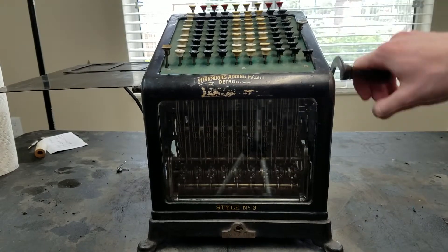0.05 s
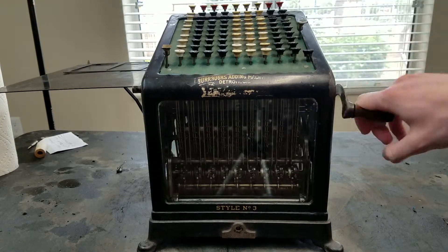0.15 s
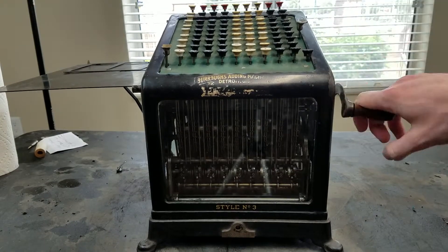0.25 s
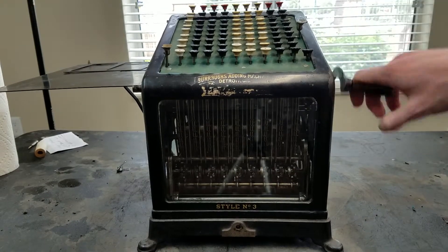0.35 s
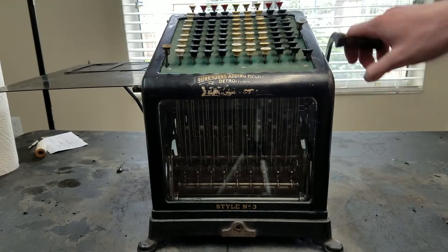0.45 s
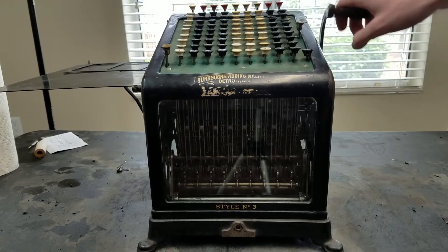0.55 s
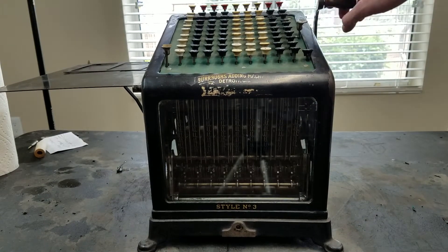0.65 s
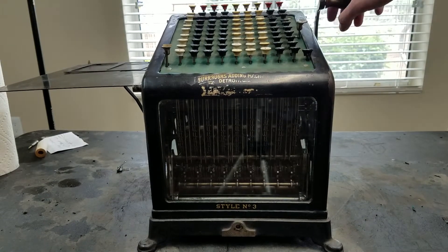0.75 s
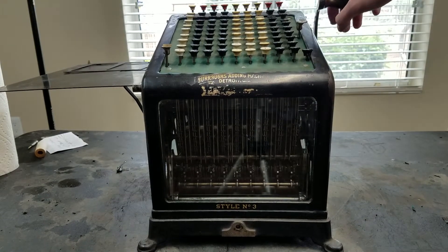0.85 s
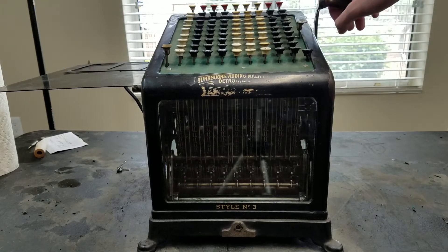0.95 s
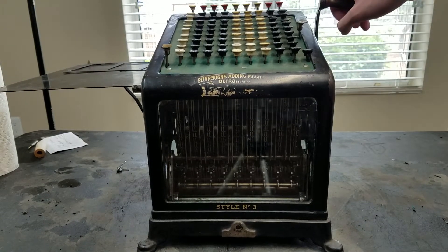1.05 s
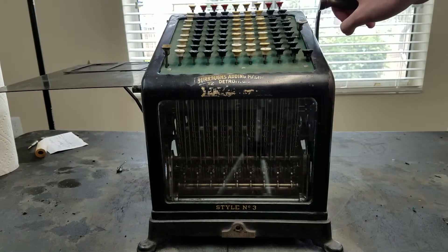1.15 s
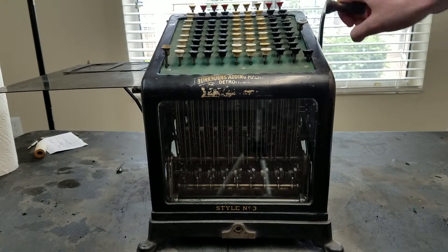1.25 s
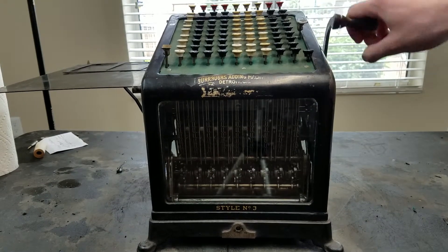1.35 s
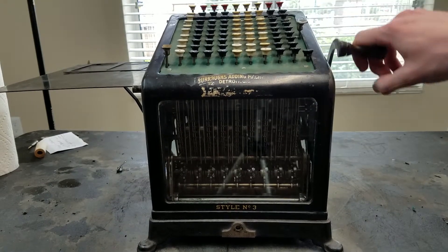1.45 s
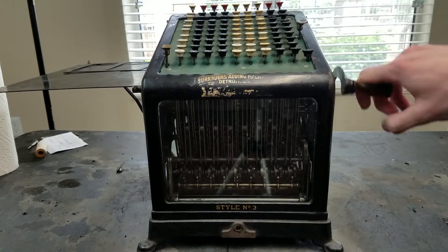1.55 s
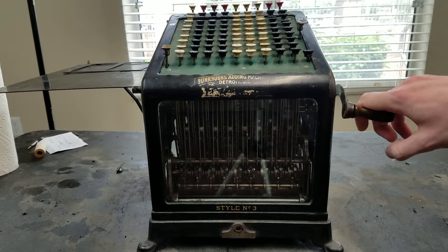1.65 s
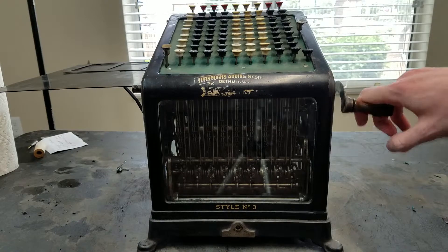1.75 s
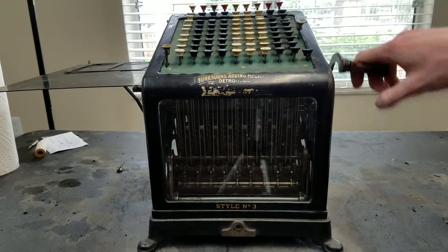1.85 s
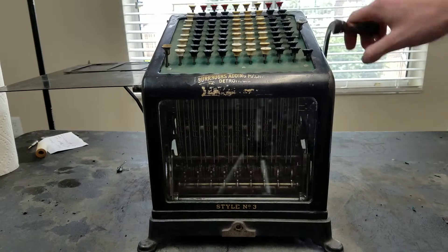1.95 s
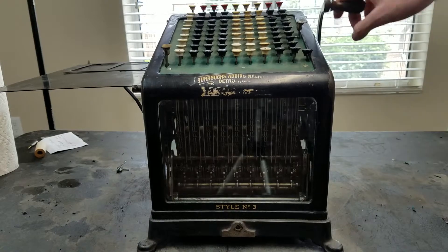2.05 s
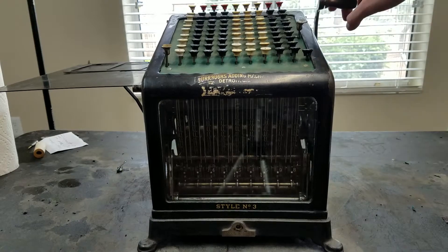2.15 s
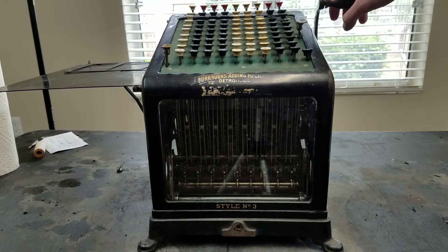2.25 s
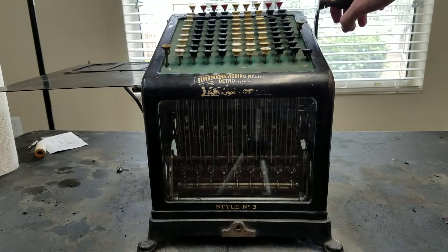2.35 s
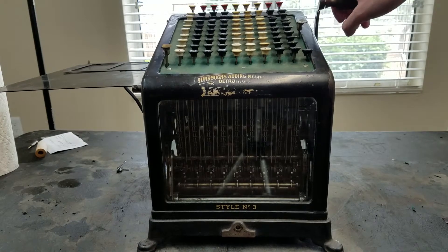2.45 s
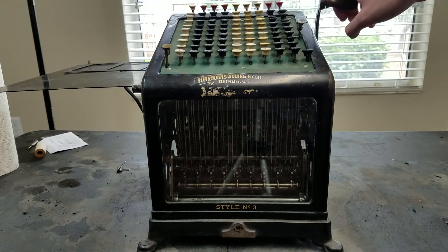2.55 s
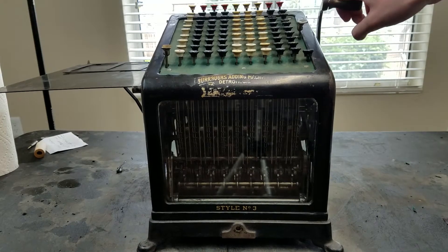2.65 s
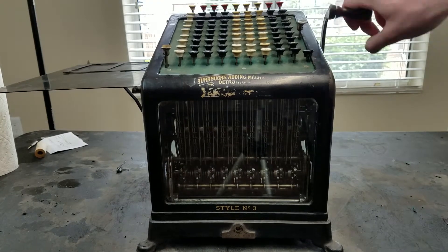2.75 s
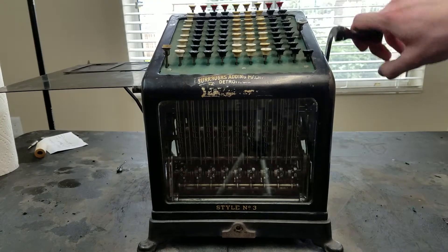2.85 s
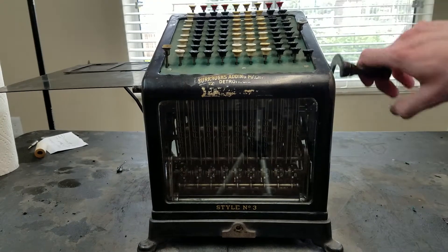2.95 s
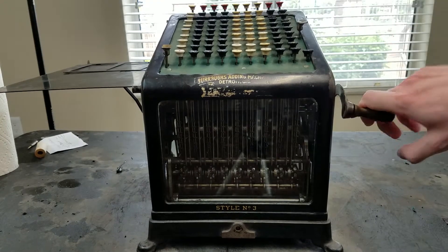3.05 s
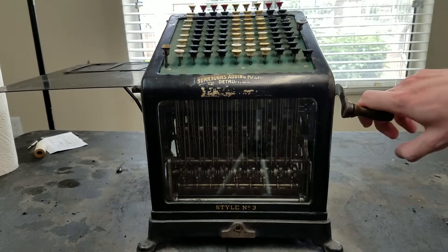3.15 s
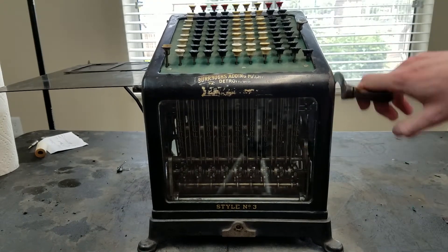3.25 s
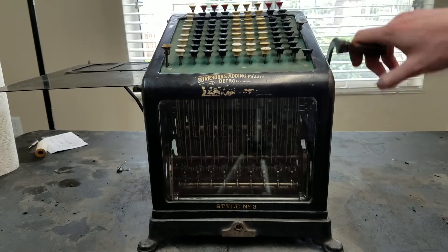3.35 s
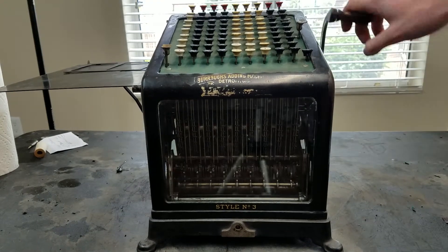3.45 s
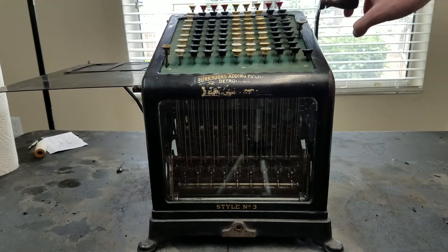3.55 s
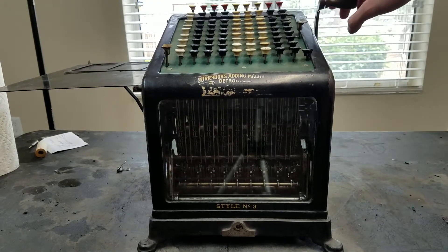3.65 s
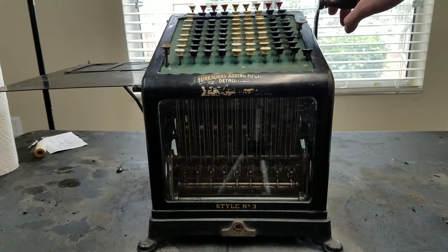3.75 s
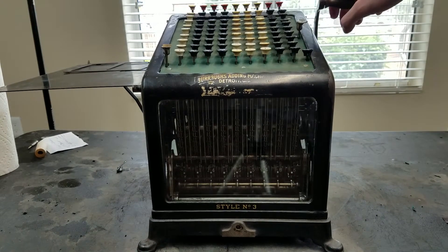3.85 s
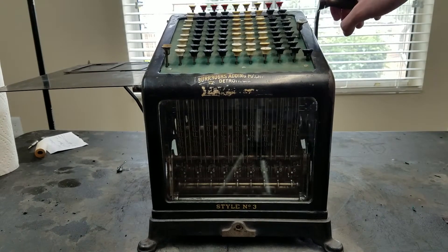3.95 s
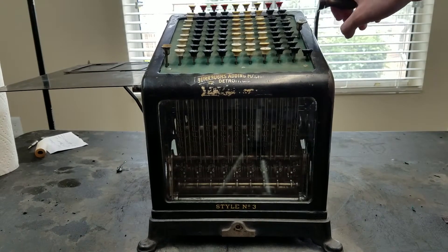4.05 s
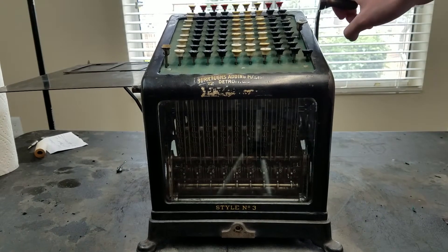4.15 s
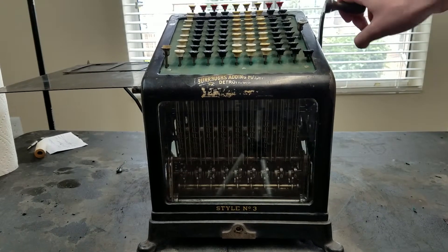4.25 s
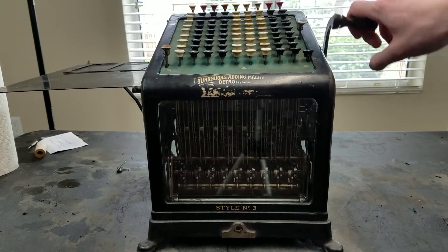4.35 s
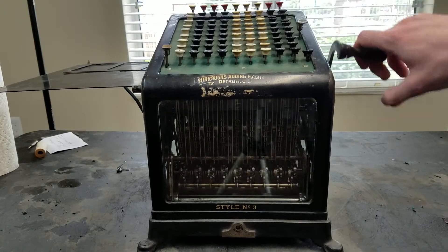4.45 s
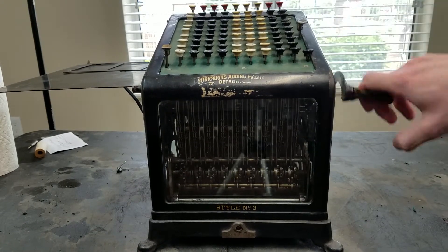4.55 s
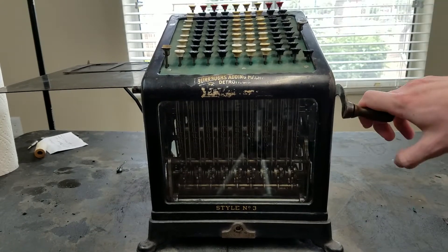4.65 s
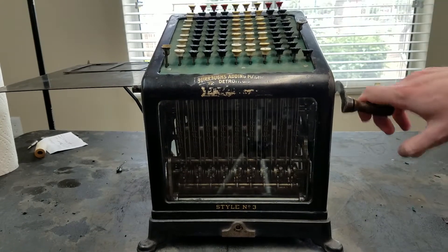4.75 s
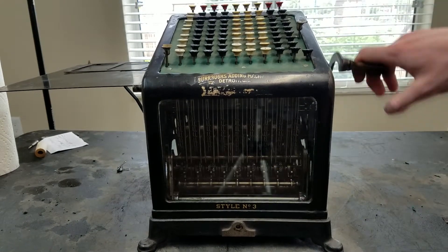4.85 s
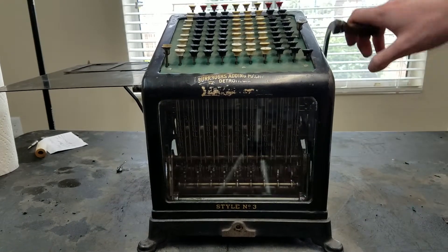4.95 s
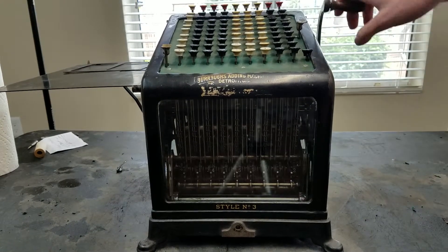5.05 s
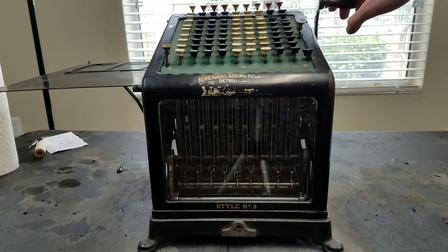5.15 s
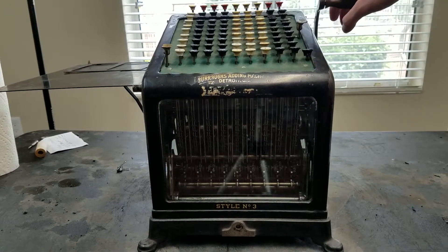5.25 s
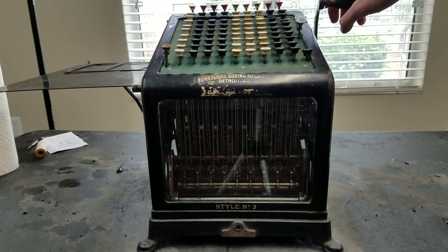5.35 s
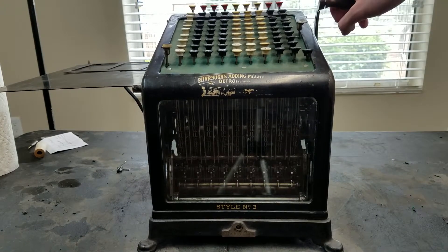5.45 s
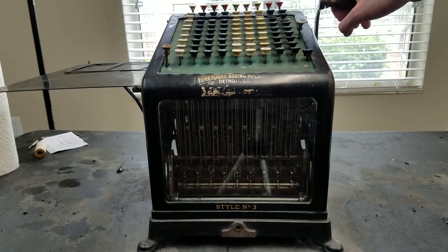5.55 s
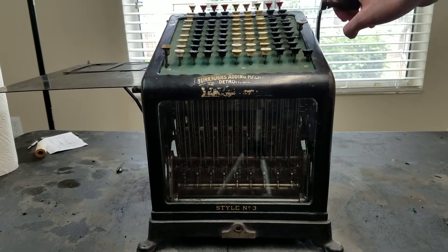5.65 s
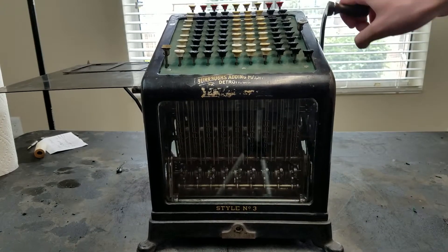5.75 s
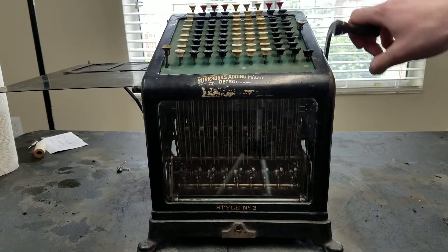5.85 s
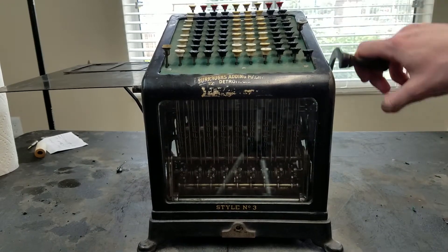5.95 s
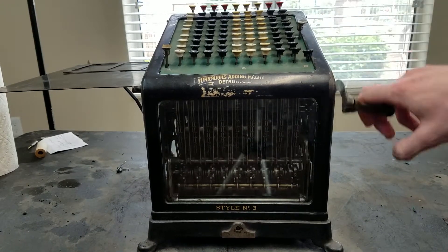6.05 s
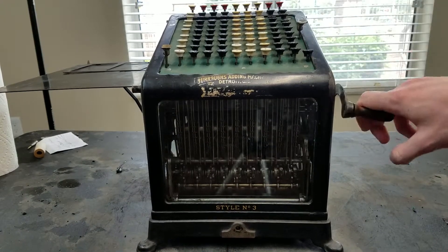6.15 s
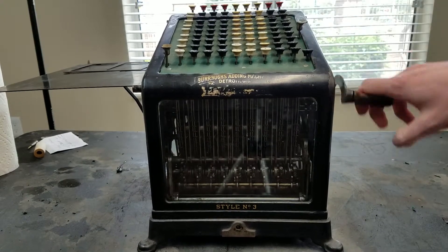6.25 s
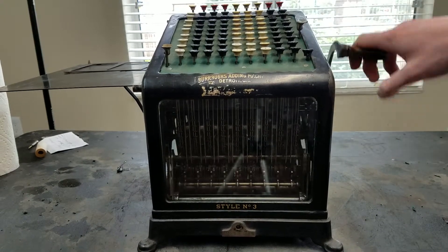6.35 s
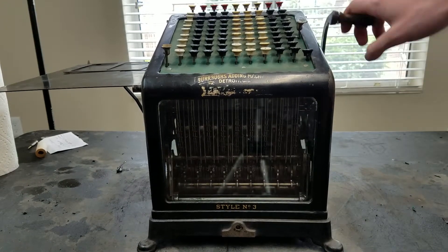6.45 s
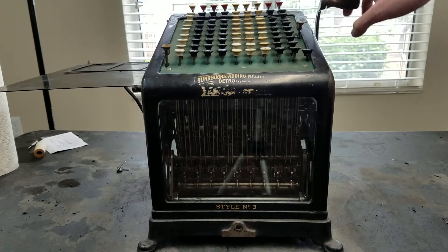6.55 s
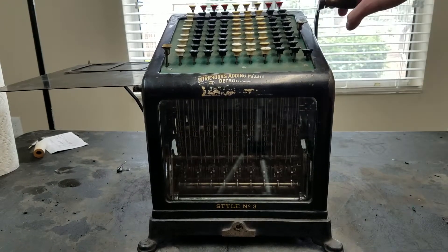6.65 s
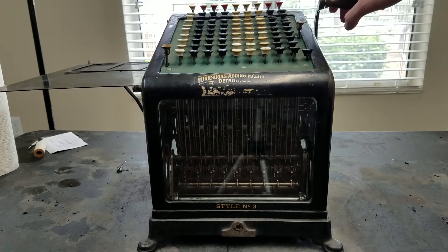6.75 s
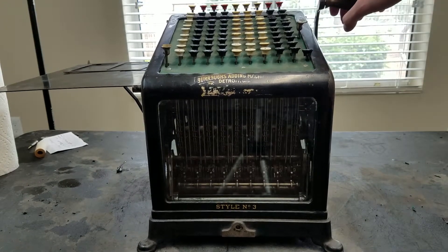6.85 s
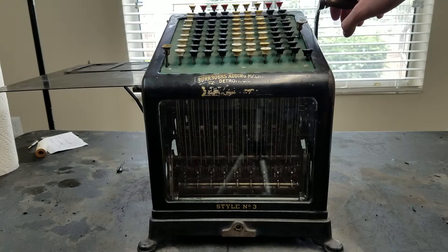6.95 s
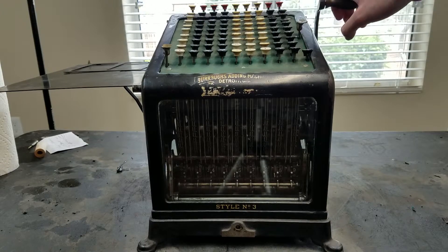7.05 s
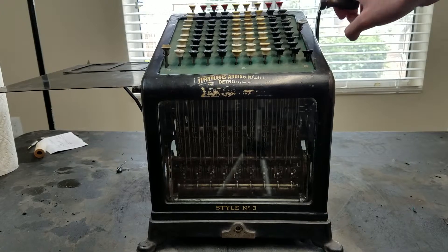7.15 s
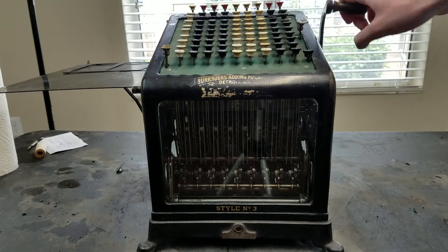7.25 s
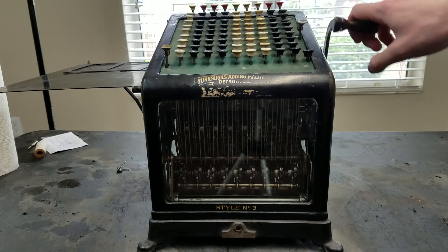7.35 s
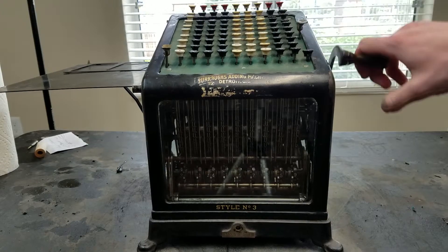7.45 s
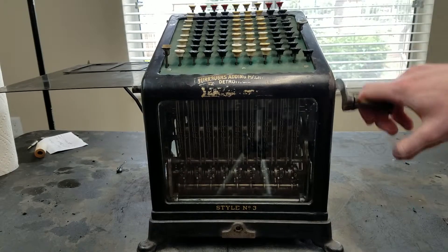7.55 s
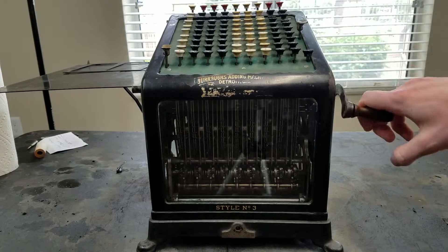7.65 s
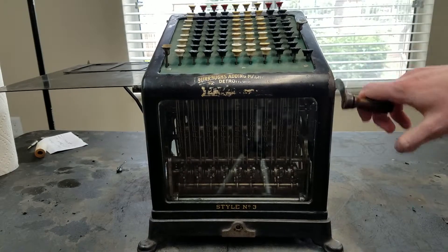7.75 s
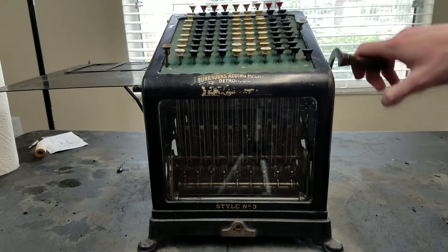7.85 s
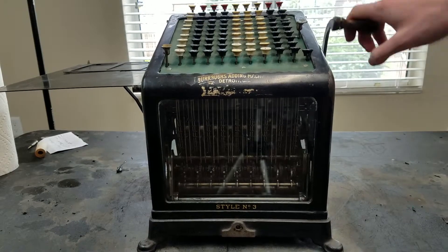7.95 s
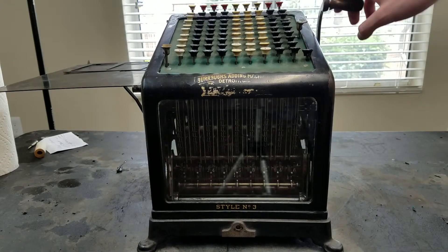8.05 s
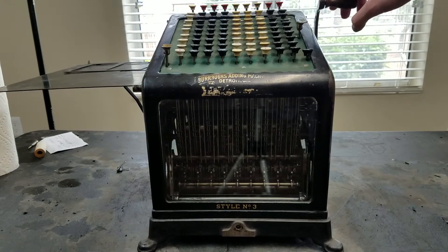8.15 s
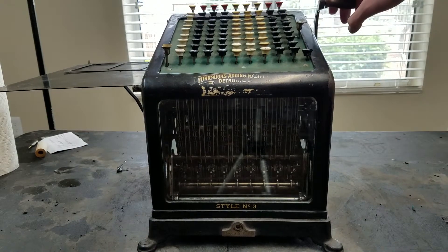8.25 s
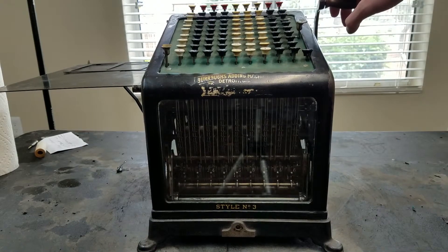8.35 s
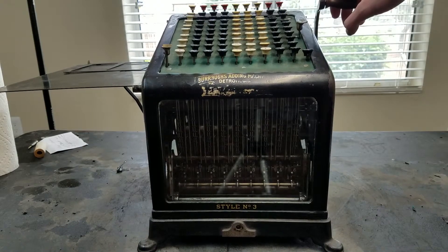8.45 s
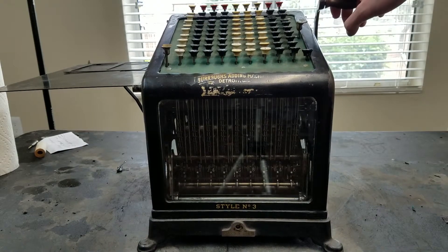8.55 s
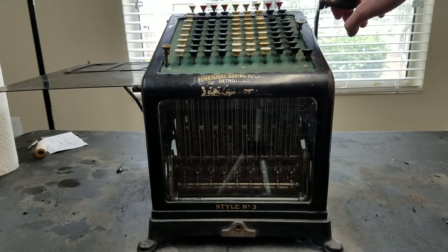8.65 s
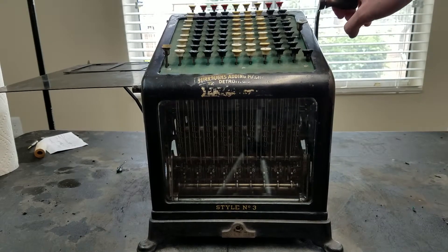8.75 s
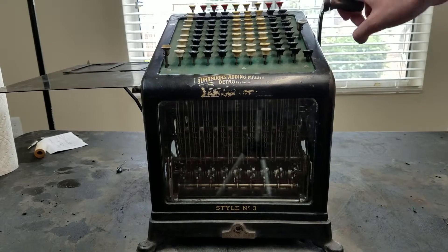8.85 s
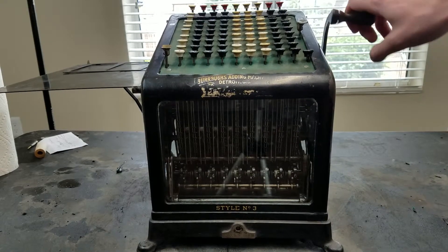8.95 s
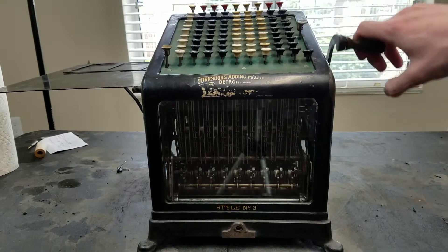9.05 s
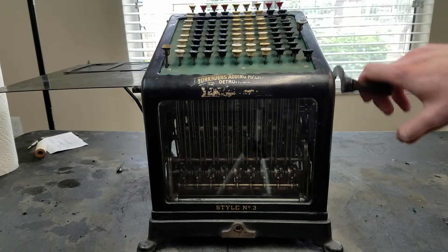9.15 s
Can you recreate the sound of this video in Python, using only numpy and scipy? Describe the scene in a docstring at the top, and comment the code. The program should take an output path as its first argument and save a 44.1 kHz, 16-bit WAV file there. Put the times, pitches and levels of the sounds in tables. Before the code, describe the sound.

A hand-cranked adding machine is pulled repeatedly, each stroke clicking, crashing with a steel ring, then rattling back to a thud in a bare room.

```python
"""A hand-cranked adding machine, pulled and let back again and again on a table in a bare room.
Every stroke runs the same chain of parts: levers click and pawls snap on the pull, the steel racks
let go with a ringing crash, gears rattle and loose levers clink on the return, and the handle lands
on its stop with a thud that the iron case, the table and the room carry on.
Soft room noise and a faint hum sit underneath."""
import sys
import numpy as np
from scipy import signal
from scipy.fft import rfft, irfft, next_fast_len
from scipy.io import wavfile
from scipy.ndimage import uniform_filter1d

SR = 44100
rng = np.random.default_rng(int(sys.argv[2]) if len(sys.argv) > 2 else 0)


def transcribe(u):
    """Save the signal u as a 16-bit wav file named by the first command-line argument.

    u: samples, shape (n,) or (channels, n), limited to [-1, 1]; the rate is SR.
    q: integer samples, one column per channel.
    """
    v = np.clip(np.atleast_2d(u).T, -1, 1)
    q = np.round(v * 32767).astype(np.int16)
    wavfile.write(sys.argv[1], SR, q)


N = 405279

# Cues of a stroke, one row each time they come round: (time [s], strength [dB])
GRIPS = [(1.1837, -1), (2.6174, -4), (4.2145, 5.5), (5.676, 4.5), (7.1427, 0.5), (8.7853, 0)]  # hand tightens on the handle
TOUCHES = [(1.2082, 0), (2.6548, -1.5), (4.2145, -0.42), (5.677, -1.5), (7.2022, -1), (8.8353, -0.72)]  # handle first stirs
TAKE_UPS = [(1.2298, 1), (2.6819, -1), (4.2376, 0), (5.7009, -1), (7.221, 1), (8.8586, -0.5)]  # slack is taken up
LATCHES = [(1.2781, 0), (2.7387, 0.00058), (4.2857, 0), (5.7548, 0), (7.275, 0), (8.9059, 0)]  # key lock drops
PAWLS = [(-0.008, 0.0059), (1.4532, 0), (2.9055, 0), (4.4492, 0.015), (5.9248, 0.0037), (7.4354, 0.0073),
         (9.0727, 0)]  # first pawl catches
CAMS = [(0.0433, 0.005), (1.5047, 0.0096), (2.9507, 0), (4.4998, 0), (5.9726, 0.0051), (7.4816, 0),
        (9.1216, 0)]  # cam passes
LANDINGS = [(0.194, 0), (1.659, 0), (3.0935, 0), (4.6413, 0), (6.117, 0.003), (7.6204, 0)]  # first rack lands
RETURNS = [(0.445, 0.0017), (1.9037, 0.0022), (3.362, 0), (4.8992, 0), (6.3627, 0), (7.881, 0.012)]  # handle starts back
MESHES = [(0.499, 0), (1.9585, 0), (3.4145, 0.0032), (4.9551, 0.0064), (6.4225, 0), (7.9449, 0.0029)]  # wheels mesh
RESETS = [(0.5875, 0), (2.0474, 0), (3.5024, 0), (5.0449, 0), (6.513, 0), (8.033, 0.012)]  # keys spring up
STOPS = [(0.691, 0), (2.154, 0.0058), (3.611, 0.0047), (5.151, 0.011), (6.618, 0), (8.141, 0)]  # handle lands on its stop
# racks let go: (time [s], ring of each of the four rack groups [dB], strength [dB])
RELEASES = [(0.175, -31.5, -25.5, -33, -37.5, 0), (1.6399, -31.5, -28.5, -36.5, -35, 0),
            (3.0781, -31, -25, -35, -35.5, 0.0099), (4.6239, -34, -27.5, -32.5, -36.5, 0),
            (6.099, -29, -27, -34.5, -38, 0.0049), (7.604, -33, -25.5, -32, -39.5, 0),
            (9.26, -30, -27, -31, -34, 0)]
CUES = dict(hand=GRIPS, touch=TOUCHES, take_up=TAKE_UPS, latch=LATCHES, pawl=PAWLS, cam=CAMS,
            release=RELEASES, landing=LANDINGS, back=RETURNS, mesh=MESHES, reset=RESETS, stop=STOPS)

# lever hits: (cue, offset [s], tick [dB], tick pitch [Hz], clack [dB], clank [dB], knock [dB])
LEVER_HITS = [("hand", 0, -68.5, 5000, -54.5, -72, -41.5), ("hand", 0.018, -69.5, 5000, -52.5, -64, -54),
              ("touch", 0, -49, 6800, -48, -56, -49), ("take_up", 0, -37.5, 4000, -41, -39, -35),
              ("take_up", .011, -41.5, 4400, -32.5, -39.5, -33),
              ("latch", -.015, -32, 6000, -28, -30.5, -42), ("latch", 0, -25.5, 6500, -32.5, -33.5, -38),
              ("latch", .003, -22, 4350, -28, -28.5, -33.5), ("latch", .029, -24, 3800, -30.5, -29, -37),
              ("latch", .049, -36, 6000, -25.5, -32.5, -30.5),
              ("pawl", -0.082, -34.5, 6900, -45, -38.5, -46.5),
              ("pawl", -.026, -25.5, 5500, -45, -32.5, -51.5), ("pawl", 0, -34, 11000, -27, -33.5, -28),
              ("pawl", 0.026, -42, 8100, -28.5, -37, -33.5), ("cam", 0, -28, 4700, -28, -32, -35),
              ("cam", .041, -32.5, 8500, -39.5, -38, -41.5),
              ("release", -0.029, -25, 6800, -29, -30, -37.5), ("release", 0, -19.5, 6600, -27.5, -27, -39),
              ("landing", 0, -24.5, 5500, -19.5, -19.5, -29), ("back", -.011, -44, 5700, -27, -32, -34),
              ("back", 0.0028, -21.5, 4400, -29, -32, -33.5), ("back", 0.02, -29, 6400, -25, -28.5, -39),
              ("mesh", 0, -29, 5200, -43, -39, -36), ("mesh", .012, -23.5, 6900, -40.5, -29, -28),
              ("reset", -0.033, -38, 10000, -30, -44, -41.5), ("reset", 0, -22, 7600, -35, -29, -35.5),
              ("reset", 0.03, -26.5, 6500, -28.5, -27.5, -32),
              ("stop", -.052, -33.5, 6000, -33, -37, -38.5),
              ("stop", -0.018, -31.5, 7600, -28.5, -30.5, -33.5), ("stop", 0, -23, 5100, -19.5, -21, -16),
              ("stop", 0.011, -29, 12000, -26.5, -31.5, -35)]
# ring of the levers and of the side plates: (frequency [Hz], width [Hz], level [dB])
LEVER_MODES = [(718.5, 81, 8), (967, 95, 7.5), (1130, 227, 4.5), (1358, 280, 4.5), (1540, 100, 4),
               (1710, 180, 0)]
PLATE_MODES = [(1962, 276, 2.5), (2598, 210, 2), (2834, 200, 3.5), (3370, 800, -7.5)]
# body of case and table: (frequency [Hz], level [dB], undamped t60 [s])
CASE_MODES = [(90, -8, 0.94), (122.2, -4.5, 1), (164, -3, 1), (197.3, -2.5, 1), (228, -1, 0.43),
              (275, 0.5, 0.3), (334.2, -2.5, 0.19), (358.7, -1, 0.16), (401.7, -5, 0.17),
              (503.5, -6.5, 0.38), (583, -16, 0.18)]
# gear train envelopes: (cue, offset [s], rattle [dB], fizz [dB], rumble [dB])
GEAR_ENVELOPES = [("touch", -.004, -100, -100, -100), ("touch", .002, -59, -71.5, -63),
                  ("take_up", 0, -66.5, -67.5, -52), ("latch", .01, -55, -43.5, -36.5),
                  ("pawl", -0.021, -48.5, -56.5, -46), ("pawl", -0.0065, -50.5, -50, -52),
                  ("pawl", 0.016, -39, -33.5, -35.5), ("release", -.043, -49, -56.5, -47.5),
                  ("release", 0.0049, -32, -25.5, -38.5), ("release", 0.043, -36, -29.5, -29.5),
                  ("back", -0.055, -55, -65, -48), ("back", -0.024, -52, -53.5, -35.5),
                  ("back", -0.0089, -40.5, -57.5, -36), ("mesh", 0.017, -35.5, -33.5, -34.5),
                  ("reset", .035, -40, -36.5, -38.5), ("stop", -0.016, -36.5, -32, -41),
                  ("stop", -0.0067, -100, -100, -100)]
# fizz of small steel parts: (frequency [Hz], level [dB])
FIZZ_EQ = [(2060, -12.5), (3500, -3), (5330, -5.5), (8970, -6.5), (9990, -10), (13800, -4.5),
           (15100, -11.5), (16000, -2)]
# single blows of pawls, keys, racks, the handle at its stop and a soft knock of the hand: (cue, offset [s],
# level [dB], pitch [Hz])
SINGLE_BLOWS = [("take_up", 0, -33, 1400), ("latch", -0.011, -34, 1800), ("latch", 0.0017, -22.5, 2000),
                ("latch", 0.029, -27, 740), ("pawl", 0, -18, 1300), ("release", -0.024, -22, 2000),
                ("release", 0, -23, 2800), ("release", 0, -15, 8800), ("reset", 0, -24, 4100),
                ("stop", .001, -12.5, 2440), ("stop", .002, -24, 1800), ("stop", .001, -13.5, 3000),
                ("landing", .001, -8.5, 1357), ("landing", .001, -17.5, 2900), ("landing", 0.014, -11, 1500),
                ("hand", 0, -47, 400), ("back", 0, -23, 1500), ("back", 0, -18.5, 2650),
                ("reset", 0.053, -18, 1500), ("stop", -0.018, -15, 1180), ("stop", .001, -14, 390),
                ("stop", .001, -8.5, 1280)]
# steel racks in four groups of lengths, per filter pass: (frequency [Hz], width [Hz], level [dB])
RACK_MODES = [
    [(4545, 130, -3.5), (4778, 69, -1), (4870, 120, 0.5), (5025, 170, -1), (5230, 230, -3), (5510, 140, -7)],
    [(5650, 170, -1.5), (6300, 200, 2.5), (6390, 170, 1), (6580, 420, -1)],
    [(7610, 120, -0.5), (7556, 110, 4), (7660, 190, -0.5), (8060, 47, 0)],
    [(10030, 150, -6.5), (10360, 260, 0), (11360, 280, -3), (12200, 200, -6), (14300, 500, -10.5)],
]
# decay of the jangle, one per rack group: (t60 [s])
RACK_T60 = [0.52, 0.32, 0.57, 0.46]
# case struck at the handle's stop: (frequency [Hz], level [dB], t60 [s])
THUD_MODES = [(125, -12.5, 1), (159, -14.5, 0.73), (190, -12.5, 1), (227, -18.5, 0.61), (263.4, -7, 0.85),
              (278.8, -4, 0.33), (323.4, -3.5, 0.26), (344.4, 1, 0.25), (392, -5, 0.22), (427, -6, 0.3),
              (476, -5, 0.29), (510.3, -1.5, 0.24), (552, -7.5, 0.31), (587, -18, 0.3)]
# colour of the room's answer: (frequency [Hz], gain [dB])
REVERB_EQ = [(80, -12.5), (250, -5), (500, -1), (1000, 0), (4000, -0.5), (15000, -6)]
# room tail: (frequency [Hz], t60 [s])
REVERB_T60 = [(80, 0.89), (250, 0.94), (600, 1), (1500, 0.81), (4000, 0.83), (10000, 0.66), (16000, 0.4)]
# room noise and the hum under it: (frequency [Hz], level [dB])
AIR_EQ = [(15, -34), (25, -4), (64, -3.5), (212, -2), (516, -7), (695, -17), (796, -16.5), (2000, -19.5),
          (8140, -41), (16000, -28)]
HUM_TONES = [(192, -59.5)]
# stereo width: (frequency [Hz], left-right likeness [0 wide, 1 mono])
LIKENESS = [(60, 0.96), (150, 1), (300, 0.94), (600, 0.53), (1200, 0.22), (2400, 0.06), (5000, 0),
            (15000, 0.023)]
# stereo balance: (frequency [Hz], left minus right [dB])
BALANCE = [(60, -2.5), (99, -1.5), (160, -0.5), (270, -2.5), (450, -3), (740, 1), (1220, -3), (2010, -2.5),
           (3330, -3.5), (5500, -7), (9080, -1.5), (15000, 2)]
# microphone colour: (frequency [Hz], gain [dB])
MIC_EQ = [(100, -4), (15600, 3), (15900, -28), (17000, -40.5)]

CLINK_HZ, CLINK_DB, CLINK_T60 = [741, 956, 1306, 2010, 2590, 2870], -26.5, 0.073
THUD_DB, LANDING_DB, SING_DB = -24, -10.5, 5  # case boom, racks landing, case ringing along
SCATTER_DB, JANGLE_DB = 1.5, 4  # level spread from hit to hit, and within a rack's shake
WAVER_RAD = 0.48  # step of the slow phase wander that roughens the thud
TOP_HZ = 17000


def amp(db):
    return 10 ** (np.asarray(db) / 20)


def unit(x):
    return x / np.sqrt(np.mean(x ** 2) + 1e-20)


def along(points, hz):
    """Reads a (frequency, value) curve on a log axis."""
    f, v = np.transpose(points)
    return np.interp(np.log(hz + 1), np.log(f + 1), v)


def filtered(x, response):
    """Plays x through a complex frequency response."""
    m = next_fast_len(x.shape[-1] + SR // 2)
    return irfft(rfft(x, m) * response(np.fft.rfftfreq(m, 1 / SR)), m)[..., :x.shape[-1]]


def resonances(peaks):
    """A resonator bank of (frequency, width, level) peaks that passes white noise at its own power."""
    def response(f):
        bank = sum((-1) ** k * amp(db) * 1j * f * width / (hz * hz - f * f + 1j * f * width)
                   for k, (hz, width, db) in enumerate(peaks))
        return bank / np.sqrt(np.mean(abs(bank) ** 2))
    return response


def case_body(decay_scale):
    """The case's modes; a scale under 1 damps them, as a hand on the handle does."""
    return resonances([(hz, 2.0 / (t60 * decay_scale), db) for hz, db, t60 in CASE_MODES])


def burst(t60, rise, size=3072):
    """Two unlike puffs of noise: several parts touch within the rise time, then die away."""
    t = np.arange(size) / SR
    return (1 - np.exp(-t / rise)) * amp(-60 * t / t60) * rng.standard_normal((2, size))


def blow(db, hz, t60=0.013):
    """A hard blow rings its lever as one short ping."""
    t = np.arange(2000) / SR
    envelope = amp(db - 60 * t / t60) * (1 - np.exp(-t / 0.0001))
    return envelope * np.sin(2 * np.pi * hz * t + 2 * np.pi * rng.random((2, 1)))


def add(track, s, sound):
    i = round(s * SR)
    sound = sound[:, max(-i, 0):max(N - i, 0)]
    track[:, max(i, 0):max(i, 0) + sound.shape[1]] += sound


def every_stroke(parts):
    """Lays a one-stroke table on its cues, in order: (time [s], strength [dB], its own columns)."""
    return sorted((s + offset, db, *rest) for cue, offset, *rest in parts for s, *_, db in CUES[cue])


def lever_clicks():
    """Each contact layers a bright tick, a clack in the levers, a plate clank and a knock in the case."""
    ticks, clacks, clanks, knocks = np.zeros((4, 2, N))
    for s, db, tick_db, hz, *body_db in every_stroke(LEVER_HITS):
        band = signal.butter(1, [.5 * hz, min(1.32 * hz, 19000)], "bandpass", fs=SR)
        puff = burst(0.019, rise=0.0009) + 0.3 * burst(0.082, rise=0.0018)  # a snap, then a rattle
        scatter_db = SCATTER_DB * rng.standard_normal(4)
        tick, clack, clank, knock = amp(db + np.array([tick_db, *body_db]) + scatter_db)
        add(ticks, s, tick * (1.81 * signal.lfilter(*band, puff) + 0.22 * np.diff(puff, prepend=0)))
        add(clacks, s, clack * burst(0.063, rise=0.0015))
        add(clanks, s, clank * burst(0.07, rise=0.0026))
        add(knocks, s, knock * burst(0.065, rise=0.0014))
    metal = filtered(clacks, resonances(LEVER_MODES)) + filtered(clanks, resonances(PLATE_MODES))
    return ticks + metal + filtered(knocks, case_body(decay_scale=0.49))


def gear_rattle():
    """Teeth and pawls chatter as dense uneven impacts, loud while the train moves, silent at rest."""
    s, strength_db, *levels_db = np.transpose(every_stroke(GEAR_ENVELOPES))
    rattle, fizz, rumble = (amp(np.interp(np.arange(N) / SR, s, strength_db + db)) for db in levels_db)
    teeth = (rng.random(N) < 350 / SR) * amp(4.5 * rng.exponential(size=N).clip(0, 2.5))
    grain = 0.37 + unit(signal.lfilter([1], [1, -np.exp(-1 / (0.0031 * SR))], teeth))  # 3 ms tails
    chatter = grain * rng.standard_normal((3, 2, N))
    metal = filtered(chatter[0],
                     lambda hz: resonances(LEVER_MODES)(hz) + 0.85 * resonances(PLATE_MODES)(hz))
    small_parts = filtered(chatter[1], lambda hz: amp(along(FIZZ_EQ, hz)))
    body = filtered(chatter[2], case_body(decay_scale=0.089))
    return rattle * unit(metal) + fizz * unit(small_parts) + rumble * unit(body)


def snaps():
    """Pawls, keys and the handle strike singly, the hand knocks softly at its grip; freed racks land in a quick
    flurry, the later ones tending softer."""
    out = np.zeros((2, N))
    for s, strength_db, db, hz in every_stroke(SINGLE_BLOWS):
        add(out, s, blow(strength_db + db, hz * (1 + 0.054 * rng.standard_normal())))
    for s, db in LANDINGS:
        for late, pitch, soft in rng.random((10, 3)):
            landing = blow(db + LANDING_DB - 9 * late - 6 * soft, 1050 * 2.3 ** pitch)
            add(out, s + 0.003 + 0.049 * late, landing)
    return out


def rack_crash():
    """Rows of nearly equal racks jangle against each other: a dense steel ring, shaken unevenly."""
    out, size = np.zeros((2, N)), SR // 2
    for s, *group_db, _ in RELEASES:
        for group, t60, level_db in zip(RACK_MODES, RACK_T60, group_db):
            detuned = [(hz * (1 + 0.0022 * rng.standard_normal()), width, db) for hz, width, db in group]
            shake_db = JANGLE_DB * np.interp(np.linspace(0, 39, size), range(40), rng.standard_normal(40))
            jangle = amp(shake_db) * burst(t60, rise=0.006, size=size)
            ring = filtered(jangle, lambda hz: resonances(detuned)(hz) ** 2)  # two passes: deep valleys
            add(out, s - .003, amp(level_db - 12) * ring)
    return out


def lever_clinks():
    """On the way back loose levers are knocked at random and ring briefly, each at its own pitch."""
    out = np.zeros((2, N))
    for (start, _), (end, _) in zip(RETURNS, STOPS):
        for late, which, soft, bend in rng.random((12, 4)):
            hz = CLINK_HZ[int(which * len(CLINK_HZ))] * (1 + .03 * (bend - .5))
            add(out, start + late * (end - start), blow(CLINK_DB - 7 * soft, hz, CLINK_T60))
    return out


def handle_thuds():
    """The handle's weight strikes the same spot each time, so the case booms at the same pitches."""
    out, t = np.zeros((2, N)), np.arange(SR) / SR
    hz, level_db, t60 = np.transpose(THUD_MODES)[:, :, None]
    attack = 1 - np.exp(-t / 0.0013)
    for s, db in STOPS:
        mid_scatter, side_gains = rng.standard_normal((2, len(THUD_MODES)))
        walks = np.cumsum(rng.standard_normal((len(THUD_MODES), 41)), axis=1)
        wander = WAVER_RAD * np.array([np.interp(40 * t, np.arange(41), w - w[0]) for w in walks])
        modes = attack * amp(level_db - 60 * t / t60) * np.sin(2 * np.pi * hz * t + wander)
        add(out, s, amp(db + THUD_DB) * np.array([amp(1.4 * mid_scatter), side_gains]) @ modes)
    return out


def case_ring(x):
    """The slow modes of case and table pick up the bass and hold it at steady pitches."""
    def held(hz):
        body = case_body(decay_scale=1)(hz)
        return amp(SING_DB) * body / abs(body).max()
    return filtered(x, held)


def room_reverb(x):
    """The room stores each band's energy and gives it back as a diffuse wash, fading at its own rate."""
    frames = dict(fs=SR, nperseg=1024, noverlap=768)
    predelayed = np.pad(x, ((0, 0), (400, 0)))[:, :N]
    hz, t, spectrum = signal.stft(predelayed, **frames)
    feedback = amp(-120 * t[1] / along(REVERB_T60, hz))  # share of power that outlives a frame
    power = uniform_filter1d(np.mean(abs(spectrum) ** 2, axis=0), size=5, axis=0)
    stored = np.array([signal.lfilter([1 - k], [1, -k], band) for k, band in zip(feedback, power)])
    wash = signal.stft(rng.standard_normal((2, N)), **frames)[2]
    wash /= np.sqrt(np.mean(abs(wash) ** 2))
    return signal.istft(wash * np.sqrt(abs(stored)), **frames)[1][:, :N]


def room_tone():
    """A bed of soft, dark noise and a faint hum."""
    air = unit(filtered(rng.standard_normal((2, N)), lambda hz: amp(along(AIR_EQ, hz))))
    hum = sum(amp(db) * np.sin(2 * np.pi * hz * np.arange(N) / SR) for hz, db in HUM_TONES)
    return amp(-61.0) * air + hum


def scene():
    """Machine and room are mixed as mid and side, then spread: near mono in the bass, wide on top."""
    clatter = lever_clicks() + rack_crash() + gear_rattle()
    blows = snaps() + lever_clinks()
    thuds = handle_thuds()
    machine = clatter + blows + thuds
    send = filtered(clatter + amp(-5.5) * blows + amp(-2.0) * thuds, lambda hz: amp(along(REVERB_EQ, hz)))
    mix = machine + case_ring(machine) + amp(-1.0) * room_reverb(send) + room_tone()
    spread = lambda hz: np.arccos(along(LIKENESS, hz)) / 2
    mid, side = filtered(mix, lambda hz: np.array([np.cos(spread(hz)), np.sin(spread(hz))]))
    return filtered(np.array([mid + side, mid - side]), lambda hz: amp(along(BALANCE, hz) * [[.5], [-.5]]))


def record(dry):
    """The microphone thins the deep bass, adds a faint rumble, tilts bright and cuts the very top."""
    low_cut = signal.butter(3, 80, "highpass", fs=SR, output="sos")
    rumble_band = signal.butter(2, 55, "lowpass", fs=SR, output="sos")
    rumble = amp(-76.0) * unit(signal.sosfilt(rumble_band, rng.standard_normal((3, N))))
    picked_up = signal.sosfilt(low_cut, dry) + rumble[0] + .4 * rumble[1:]
    return filtered(picked_up, lambda hz: amp(along(MIC_EQ, hz)) * (hz < TOP_HZ))


dry = scene()
out = record(dry)
transcribe(out)
```